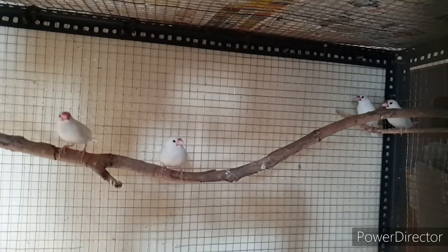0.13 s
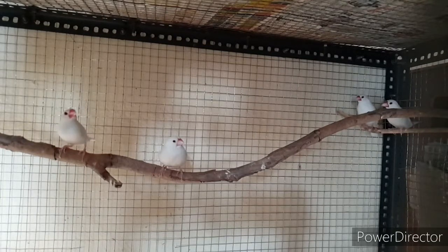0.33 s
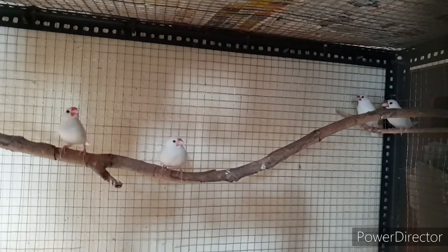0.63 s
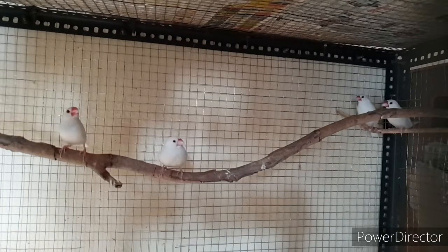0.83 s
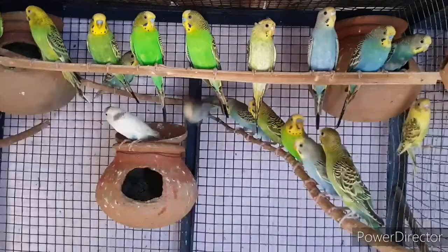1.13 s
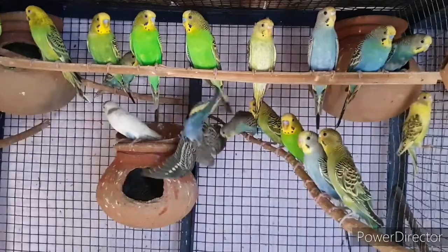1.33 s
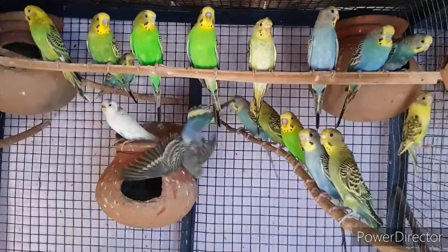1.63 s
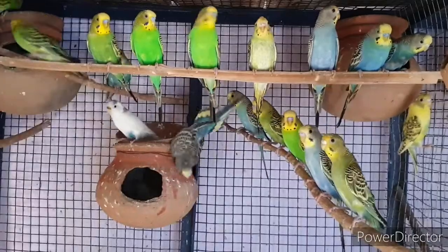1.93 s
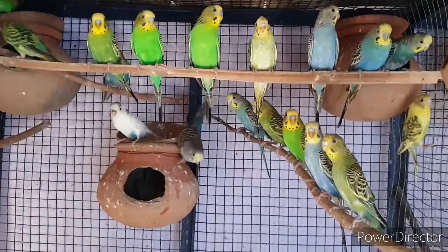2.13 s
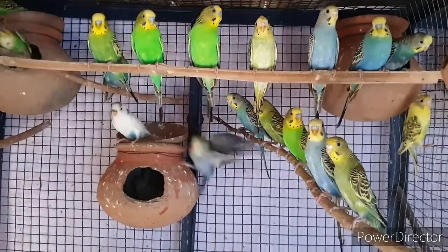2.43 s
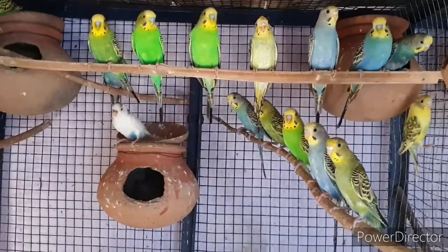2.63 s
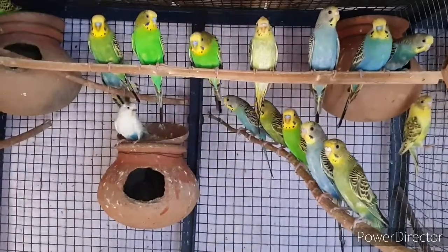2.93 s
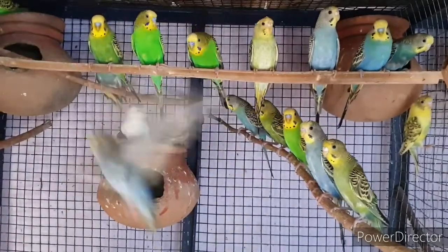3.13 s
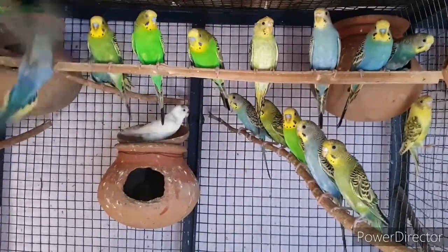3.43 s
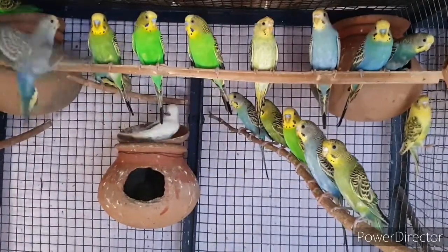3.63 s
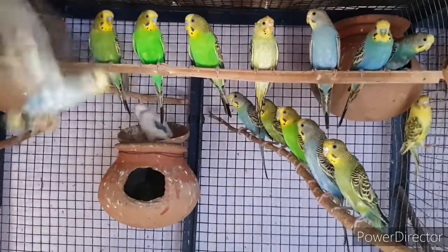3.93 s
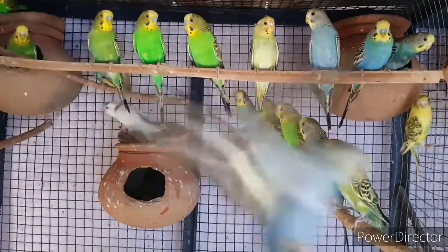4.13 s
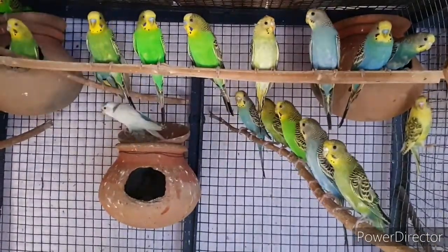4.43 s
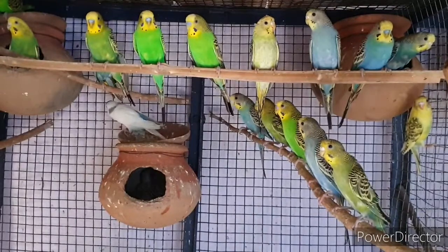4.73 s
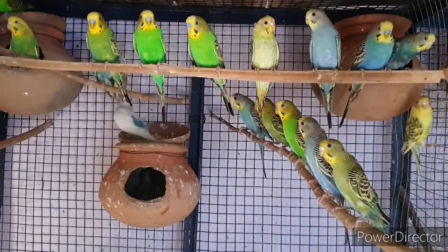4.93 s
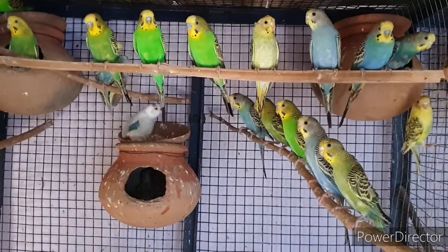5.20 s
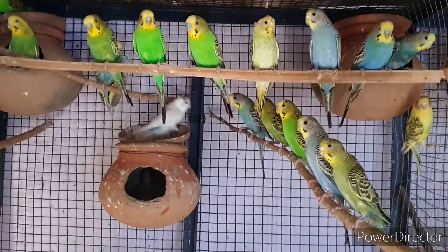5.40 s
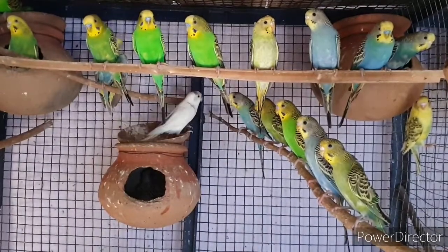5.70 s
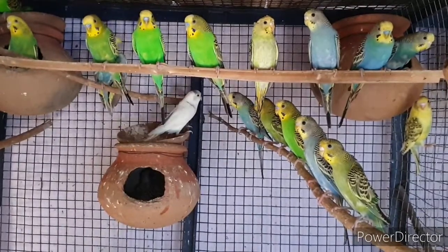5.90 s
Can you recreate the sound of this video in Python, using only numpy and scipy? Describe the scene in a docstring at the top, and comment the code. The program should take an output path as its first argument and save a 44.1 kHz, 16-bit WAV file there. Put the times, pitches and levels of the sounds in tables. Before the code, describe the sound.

Inside a wire aviary, faint soft hops in a muffled quiet give way without warning to loud, raspy scolding squawks from one small parrot near the centre. After the scolding stops, birds whirr past the microphone in short flights with thumping air, bright quill rustle and sharp wing flicks. Small woody or clay knocks and a few gentle, distant chirps dot the bustle, with a short room tail.

```python
"""In a wire aviary, budgerigars squabble. A muffled hush with a few soft hops breaks off abruptly into harsh squawks.
Birds flutter past the microphone, flick their wings, knock on perches and pots, and give a few soft chirps.
Calls are harmonic tones on moving pitches, the squawks roughened by a rattle and a ringing rasp.
Wings are coloured noise and pressure pulses; knocks are noise bursts with a short ring; hollow notes are
wavering sines. Calls pass through scattered echoes and a room tail."""
import sys
import numpy as np
from scipy import signal
from scipy.fft import rfft, irfft, next_fast_len
from scipy.io import wavfile
from scipy.ndimage import uniform_filter1d

SR = 44100
rng = np.random.default_rng(int(sys.argv[2]) if len(sys.argv) > 2 else 0)


def transcribe(signal):
    """Save signal, clipped to [-1, 1], as a 16-bit WAV file at the path in sys.argv[1]."""
    frames = np.atleast_2d(signal).T
    limited = np.clip(frames, -1, 1)
    pcm = np.round(limited * 32767).astype(np.int16)
    wavfile.write(sys.argv[1], SR, pcm)


N = 267201
TIME = np.arange(N) / SR

# wing noises, relative spectra: freq_hz, level_db
# broad whoosh of moved air
WHOOSH_SPECTRUM = [(70, -30.5), (130, -1), (250, 0), (370, -4), (540, -1.5), (800, -7.5), (1100, -14.5),
                   (2500, -27), (5000, -73)]
# bright rustle of quills
FEATHER_SPECTRUM = [(710, -31), (1200, -5), (2430, -5), (4960, -1.5), (6720, -8), (8720, -22), (10700, -9),
                    (12200, -11.5), (14800, -15), (16000, -32.5)]


def from_db(db):
    """Decibels to amplitude."""
    return 10 ** (np.asarray(db) / 20)


def rms_one(x):
    """Scale a sound to rms 1."""
    return x / np.sqrt(np.mean(x ** 2) + 1e-20)


def shaped(x, points, share=1):
    """Colour a sound by a curve of (Hz, dB), read along log frequency; share scales the dB."""
    hz, db = np.transpose(points)
    size = next_fast_len(x.shape[-1])
    log_hz = np.log(np.maximum(np.arange(size // 2 + 1) * SR / size, 1))
    gain = from_db(share * np.interp(log_hz, np.log(hz), db))
    return irfft(rfft(x, size) * gain, size)[..., :x.shape[-1]]


def noise(spectrum, alike, size=N):
    """Coloured stereo noise of rms 1; alike is the left-right likeness, 1 for mono."""
    mid, side = rng.standard_normal((2, size))
    alike = np.clip(alike, -1, 1)
    stereo = np.sqrt(1 + alike) * mid + np.sqrt(1 - alike) * side * [[1], [-1]]
    return rms_one(shaped(stereo, spectrum))


def wobble(rate_hz, size):
    """Random drift of rms 1 that heads for a new value rate_hz times a second."""
    knots = rng.standard_normal(int(size * rate_hz / SR) + 3)
    return rms_one(np.interp(np.arange(size) * rate_hz / SR, np.arange(len(knots)), knots))


def add(out, s, sound):
    """Mix a sound in at time s."""
    i = max(int(s * SR), 0)
    out[..., i:i + sound.shape[-1]] += sound[..., :N - i]


def burst(t, rise_s, t60):
    """An envelope that rises straight, then dies away by 60 dB in t60 seconds."""
    return np.minimum(t / rise_s, 1) * from_db(-60 * np.maximum(t - rise_s, 0) / t60)


def gate(t, attack_s, release_s):
    """An envelope over times t: attack, hold, release."""
    return np.minimum(t / attack_s, 1) * np.minimum((t[-1] - t) / release_s, 1)


def cycles(rate_hz, unsteady, change_hz, size):
    """Count of cycles gone by at an unsteady rate."""
    return np.cumsum(rate_hz * (1 + unsteady * wobble(change_hz, size))) / SR


def ticks(count):
    """A unit click at the start of each cycle."""
    return np.diff(np.floor(count), prepend=0)


def hush(hush_db=-58):
    """Dull stereo noise, with muffled hops as dying bursts of a duller knock colour."""
    # quiet background, relative spectrum: freq_hz, level_db
    hush_spectrum = [(12, -41.5), (20, 4.5), (42, -11.5), (76, -22.5), (144, -25), (571, -31.5), (772, -23),
                     (978, -47), (1350, -35), (1990, -33), (3400, -51.5), (4420, -99), (7480, -120)]
    # muffled hops: start_s, level_db, t60_s
    hop_events = [(0.117, -60, 0.45), (.39, -62, .3), (0.448, -56.5, 0.81)]
    # body of a hop, relative spectrum: freq_hz, level_db
    hop_spectrum = [(90, -17), (150, 8), (300, -7), (700, 2), (1000, -33), (1280, 8), (1680, 7), (1990, 3),
                    (2500, -34), (2800, -13), (3640, -65), (6160, -120)]
    envelope = np.zeros(N)
    for s, level_db, t60 in hop_events:
        add(envelope, s, from_db(level_db) * burst(TIME[:SR], 0.0021, t60))
    return from_db(hush_db) * noise(hush_spectrum, 0.11) + envelope * noise(hop_spectrum, 0.14)


def syrinx(pitch, partials):
    """Voice organ: harmonics in step on one moving pitch."""
    phase = 2 * np.pi * np.cumsum(pitch) / SR
    return sum(from_db(db) * np.sin(round(k) * phase) for k, db in partials)


def rasp(rattles, ring_t60=0.0069, hiss_db=-2):
    """Each rattle sets the throat ringing in the same way; some hiss rides along."""
    # rasp of the throat, relative spectrum: freq_hz, level_db
    rasp_spectrum = [(530, -62), (900, -28.5), (1120, -29.5), (1720, -22.5), (1970, -5.5), (2270, -16.5),
                     (2500, -8.5), (3230, -6), (4740, -5), (5890, 1.5), (7400, -22), (10200, -21),
                     (11800, -23), (13700, -19.5), (16000, -37.5)]
    t = TIME[:SR // 100]
    ring = rng.standard_normal(len(t)) * burst(t, 0.00048, ring_t60)
    buzz = rms_one(signal.fftconvolve(ticks(rattles), ring)[:len(rattles)])
    hiss = from_db(hiss_db) * rng.standard_normal(len(rattles))
    return rms_one(shaped(buzz + hiss, rasp_spectrum))


def squawks(rattle_hz=340, unsteady=.05, jitter=.06, jitter_hz=1300, quaver=.03, swing=0.13,
            rasp_share=0.87, shimmer_db=3.0, rattle_depth=0.45):
    """Calls glide in pitch and level; forced hard, the syrinx rattles and the tone breaks into a buzzing rasp."""
    # scolding squawks, before echoes: start_s, length_s, mid_call_pitch_hz, rise_octaves,
    # mid_call_level_db, swell_over_call_db, mid_call_roughness (0-1)
    squawk_calls = [(1.162, 0.047, 2156, .02, -35.5, -15, 0.66), (1.206, 0.052, 2390, .1, -23.5, 6, 0.9),
                    (1.254, 0.092, 2576, .16, -19.5, 0, 0.63), (1.389, .08, 2226, 0.0028, -15, 0.5, 0.3),
                    (1.515, 0.088, 2215, .04, -15, 7, 0.28), (1.647, 0.092, 2172, .28, -12.5, 1.5, 0.25),
                    (1.805, 0.13, 2480, .18, -19, -2.5, 0.77), (2.004, 0.1, 2486, .05, -17.5, 11.5, 0.52),
                    (2.319, .068, 2405, 0.0773, -30, 14, 0.35),
                    (2.447, 0.071, 2518, -0.013, -22, -1.5, 0.43), (2.616, 0.11, 2400, .1, -25, 5.5, 0.79)]
    # voice before the beak: harmonic_number, relative_level_db
    squawk_partials = [(1, -8), (2, 4), (3, -8), (4, -16.5), (5, -21), (6, -25.5)]
    # resonances of throat and beak: freq_hz, gain_db
    beak_curve = [(1200, -16.5), (2100, -6.5), (2700, 1), (3400, -17.5), (4200, 2.5), (5000, 0.5),
                  (6400, 4.5), (7800, -13.5), (9500, 0.5), (15000, -12.5)]
    arch_db = 5.5   # a call is this much weaker at its ends than in the middle, apart from its swell
    glide_bend = .7   # the glide steepens toward the end
    edge_roughness, settle_s = 0.6, .017   # a call starts and ends hoarser than it is in between
    attack_s, release_s = 0.014, .011
    out = np.zeros(N)
    for s, length_s, hz, rise, level_db, swell_db, roughness in squawk_calls:
        t = TIME[:int(length_s * SR)]
        size, along = len(t), t / length_s - .5
        pitch = hz * 2 ** (rise * (along + glide_bend * along ** 2))

        edge = np.exp(-np.minimum(t, length_s - t) / settle_s)
        rough = np.clip(roughness + (1 - roughness) * edge_roughness * edge, 0, 1)
        rattles = cycles(rattle_hz, unsteady, 200, size)
        rattle = np.sin(2 * np.pi * rattles)
        rough_scatter = rough * (jitter * wobble(jitter_hz, size) + swing * rattle)
        scatter = quaver * wobble(520, size) + rough_scatter
        tone = rms_one(shaped(syrinx(pitch * (1 + scatter), squawk_partials), beak_curve))

        # the rougher the call, the more rasp replaces tone, at constant power
        broken = np.clip(rasp_share * rough ** 2, 0, 1)
        voice = np.sqrt(1 - broken ** 2) * tone + broken * rasp(rattles)
        shimmer = from_db(shimmer_db * wobble(450, size))
        voice = rms_one(voice * (1 + rattle_depth * rough * rattle) * shimmer)
        level = from_db(level_db + swell_db * along - arch_db * (2 * along) ** 2)
        add(out, s, voice * level * gate(t, attack_s, release_s))
    return out


def nearness():
    """Gains of draught, whoosh and rustle: each flight swells as the bird nears and fades; flights add in power."""
    # short flights, levels before the trims in flight(): nearest_s, approach_s, departure_s,
    # draught_db, whoosh_db, rustle_db
    passes = [(1.3, 0.2, 0.43, -61, -49.5, -53.5), (1.8, 1, 0.95, -57.5, -57.5, -61),
              (2.719, 0.14, 0.34, -59, -40, -60), (3.02, 0.83, 0.53, -41, -43, -59.5),
              (3.29, 0.39, 0.26, -67, -48, -57.5), (3.44, 0.31, 0.11, -55, -66, -58),
              (3.6, 0.18, 0.34, -53, -51.5, -62.5), (3.999, 0.23, 0.32, -55, -48.5, -63.5),
              (4.13, 0.17, .2, -42.5, -51.5, -62), (4.318, 0.17, 0.23, -35.5, -43, -56.5),
              (4.44, 0.054, 0.4, -44, -55.5, -64.5), (4.66, .15, 0.21, -41, -50, -63.5),
              (4.85, 0.13, 0.37, -51, -45, -57.5), (5.07, 0.32, 0.22, -51, -46.5, -61),
              (5.159, 0.22, 0.25, -40.5, -47.5, -64), (5.531, 0.026, 0.16, -45.5, -62, -60.5),
              (5.898, 0.082, 0.088, -70.5, -53.5, -61)]
    # gain over the approach and loss over the departure: one entry each for draught, whoosh, rustle [dB]
    fade_db = [22, 21, 20.5]
    power = np.zeros((3, N))
    for s, approach_s, departure_s, *levels_db in passes:
        away = np.clip(np.maximum((s - TIME) / approach_s, (TIME - s) / departure_s), 0, 10)
        power += from_db(np.array(levels_db)[:, None] - np.outer(fade_db, away)) ** 2
    return np.sqrt(power)


def flight(beat_hz=28, beat_db=11, thump_hz=68, thump_db=-5, crackle_db=1.5, clump_db=2.0,
           draught_db=-1, whoosh_db=-0.54, feather_db=9.5):
    """Wingbeats throw pressure pulses, puffs of whoosh and feather rustle; the draught buffets the microphone."""
    # draught on the microphone, relative spectrum: freq_hz, level_db
    gust_spectrum = [(15, -34.5), (25, -23), (43, 2.5), (59, 4), (108, -0.5), (220, -15), (290, -35),
                     (480, -120)]
    draught, whoosh, feather = nearness()
    beats = cycles(beat_hz, .2, 12, N)
    # quick push, slower fade
    throb = rms_one(uniform_filter1d(from_db(-beat_db * (beats % 1)), SR // 200))
    pulse = np.gradient(signal.windows.gaussian(SR // 30, SR / (2 * np.pi * thump_hz)))
    thumps = rms_one(signal.fftconvolve(ticks(beats), pulse, "same"))
    grains = rms_one(from_db(crackle_db * wobble(550, N) + clump_db * wobble(83, N)))
    lows = draught * (from_db(draught_db) * noise(gust_spectrum, 0.57) + from_db(thump_db) * thumps)
    puffs = whoosh * from_db(whoosh_db) * noise(WHOOSH_SPECTRUM, 0.58)
    rustle = feather * from_db(feather_db) * grains * noise(FEATHER_SPECTRUM, .1)
    # the root keeps quills rubbing between beats
    return lows + throb * puffs + np.sqrt(throb) * rustle


def hollows(waver=0.055):
    """Short low notes, as of air stirred in a nest pot: wavering sines that swell and fade."""
    # hollow notes: centre_s, pitch_hz, peak_rms_level_db, half_length_s (spread of the bell-shaped envelope)
    hollow_notes = [(1.333, 377, -52.5, 0.02), (2.004, 102.8, -55.5, 0.16), (2.094, 378, -42, 0.013),
                    (2.184, 385, -50, 0.019), (4.036, 550, -43.5, 0.0032), (4.814, 375, -37.5, 0.0046),
                    (4.856, 362.7, -41.5, 0.019), (5.262, 413, -47.5, 0.032)]
    out = np.zeros(N)
    for s, hz, level_db, half_s in hollow_notes:
        t = np.arange(-SR // 10, SR // 10) / SR
        pitch = hz * (1 + waver * wobble(136, len(t)))
        tone = np.sqrt(2) * np.sin(2 * np.pi * np.cumsum(pitch) / SR)
        add(out, s + t[0], from_db(level_db) * tone * np.exp(-.5 * (t / half_s) ** 2))
    return out


def chirps(jitter=0.02):
    """Gentle calls dip, glide upward and ease back, with a slight tremble, through a nearly closed beak."""
    # soft chirps: start_s, length_s, mid_call_pitch_hz, rise_octaves (lowest to highest),
    # level_db (before partials, beak and echoes)
    chirp_calls = [(2.415, .031, 1852, .16, -40), (3.856, 0.1, 2002, 0.25, -53),
                   (4.068, .145, 1407, 0.155, -55.5), (4.541, 0.014, 1310, .04, -50),
                   (4.574, 0.021, 1300, 0.043, -45.5)]
    # voice before the beak: harmonic_number, level_db
    chirp_partials = [(1, 2), (2, -4.5)]
    # a nearly closed beak: freq_hz, gain_db
    closed_beak = [(1900, -2.5), (2700, 0.5), (3600, 10.5), (4300, -23.5)]
    edge_s = 0.0086   # fade at both ends
    bend_cycles = .8   # share of a sine that the glide follows
    out = np.zeros(N)
    for s, length_s, hz, rise, level_db in chirp_calls:
        t = TIME[:int(length_s * SR)]
        glide = np.sin(2 * np.pi * bend_cycles * (t / length_s - .5))
        pitch = hz * 2 ** (rise / 2 * glide)
        tone = syrinx(pitch * (1 + jitter * wobble(615, len(t))), chirp_partials)
        add(out, s, tone * from_db(level_db) * gate(t, edge_s, edge_s))
    return shaped(out, closed_beak)


def strokes(swish_db=-12, push_db=-5.5, swish_t60=0.078, push_t60=0.17, crackle_db=2.0):
    """A hard wing stroke is a crackling swish of quills with a soft push of air; runs build up and ease off."""
    # runs of hard wingbeats, levels before the swish and push trims: hardest_s, beats_before, beats_after
    # (both rounded to whole beats), interval_s, feather_db, air_push_db, loss_per_beat_db
    wing_runs = [(2.9203, 2, 4, .035, -33, -37.5, 1.4), (4.6494, -0.5, 2, .032, -22.5, -56, 7.5),
                 (4.9334, 8.5, 2, .0435, -23.5, -51, 3)]
    # lone flicks of a wing, levels before the same trims: time_s, feather_db, air_push_db
    wing_flicks = [(3.285, -27, -44), (3.4558, -29.5, -43.5), (3.506, -35, -58), (3.551, -31, -45),
                   (3.776, -38.5, -62), (3.907, -30.5, -66), (3.9568, -26, -60), (4.315, -25.5, -39),
                   (4.598, -34, -65), (5.496, -31.5, -53), (5.559, -38.5, -59), (5.593, -35.5, -59)]
    beats = []
    for s, before, after, interval_s, feather_db, air_db, loss_db in wing_runs:
        for k in range(-round(before), round(after) + 1):
            loss = loss_db * abs(k)
            beats.append((s + k * interval_s, feather_db - loss, air_db - loss))

    swish, push, t = np.zeros(N), np.zeros(N), TIME[:SR // 5]
    for s, feather_db, air_db in beats + list(wing_flicks):
        add(swish, s - .001, from_db(feather_db + swish_db) * burst(t, 0.00098, swish_t60))
        add(push, s - .001, from_db(air_db + push_db) * burst(t, 0.00045, push_t60))
    crackle = rms_one(from_db(crackle_db * wobble(1200, N)))
    quills = swish * crackle * noise(FEATHER_SPECTRUM, 0.03)
    return quills + push * noise(WHOOSH_SPECTRUM, 0.85)


def knocks(crack_db=-3, crack_t60=0.017, shiver_db=-19, shiver_t60=0.13, ring_db=-8, ring_t60=0.02):
    """A dry crack and a short ring from the struck spot, then the perch and mesh shiver briefly."""
    # feet and beaks on perches and pots: time_s, level_db (before crack, shiver and ring trims),
    # ring_hz, left_minus_right_db
    blows = [(3.46, -34.5, 810, 3), (3.522, -24.5, 876, 1), (3.574, -20, 845, -1.5),
             (3.906, -41.5, 1040, 2), (4.578, -39, 1260, -1), (4.651, -30, 1410, -2),
             (5.518, -24.5, 1446, -9.5)]
    # crack and shiver, relative spectrum: freq_hz, level_db
    knock_spectrum = [(47, -35), (80, 14.5), (422, -6), (650, 1), (1050, -3.5), (1490, -6.5), (2900, -14.5),
                      (4830, -6.5), (6450, -7.5), (8790, -30), (10700, -14), (12800, -11), (14600, -21),
                      (16000, -38)]
    out, t = np.zeros((2, N)), TIME[:SR // 3]
    for s, level_db, hz, pan_db in blows:
        crack = from_db(crack_db) * burst(t, 0.00066, crack_t60)
        shiver = from_db(shiver_db) * burst(t, 0.0066, shiver_t60)
        ring = from_db(ring_db) * burst(t, 0.0007, ring_t60) * np.sin(2 * np.pi * hz * t)
        gains = from_db(level_db + pan_db * np.array([[.5], [-.5]]))
        add(out, s, gains * ((crack + shiver) * noise(knock_spectrum, 0.31, len(t)) + ring))
    return out


def aviary(x, port_lag_s=.00007, direct_db=-3, early_db=-2, early_t60=0.063, tail_db=-14, tail_t60=0.38):
    """Sound reaches the left port first; close walls scatter it and the room adds a tail."""
    t = TIME[:SR * 3 // 4]
    shape = (2, len(t))
    # sparse early reflections, then a dense tail
    early = rng.standard_normal(shape) * (rng.random(shape) < .06) * burst(t, 0.003, early_t60)
    tail = rng.standard_normal(shape) * burst(t, 0.028, tail_t60)
    echoes = sum(from_db(db) * h / np.linalg.norm(h, axis=1, keepdims=True)
                 for db, h in [(early_db, early), (tail_db, tail)])
    direct = np.array([x, np.interp(TIME - port_lag_s, TIME, x)])
    return from_db(direct_db) * direct + signal.fftconvolve(x[None], echoes, axes=1)[:, :N]


def moving(x, turn_hz=2.7, count=3):
    """The callers dart about, so their echoes pass through several patterns in turn."""
    turns = [np.cos(2 * np.pi * (turn_hz * TIME - k / count)) for k in range(count)]
    shares = np.maximum(turns, 0)
    return sum(aviary(x * share) for share in shares / np.linalg.norm(shares, axis=0))


def scene(outbreak_s=1.167, air_db=-64):
    """The hush gives way abruptly to squabbling and flight over a faint air noise."""
    # where the scolding bird is: time_s, left_minus_right_db
    place = [(1.3, -1), (1.45, 1), (1.58, -1), (1.69, -4), (1.85, -0.5), (2.08, -1), (2.33, -2),
             (2.67, -1.5)]
    # background air, relative spectrum: freq_hz, level_db
    air_spectrum = [(18, -42.5), (30, -23), (66, -4), (199, -20), (374, -14), (750, -18.5), (1050, -23),
                    (1320, -24.5), (1670, -18), (2010, -33.5), (6000, -25.5), (8500, -47), (12000, -39),
                    (16000, -45)]
    place_s, place_db = np.transpose(place)
    pan_db = np.interp(TIME, place_s, place_db)
    scolding = moving(squawks()) * from_db(pan_db * [[.5], [-.5]])
    birds = scolding + aviary(chirps())
    air = from_db(air_db) * noise(air_spectrum, 0.076)
    bustle = flight() + strokes() + knocks() + hollows() + air
    awake = np.clip((TIME - outbreak_s) / 0.00062, 0, 1)   # crossfade in under a millisecond
    return (1 - awake) * hush() + awake * (birds + bustle)


def record(dry, cutoff_hz=15900, ceiling=.85):
    """The left port is brighter; peaks are rounded and the top is cut."""
    # the microphone's lean to the left: freq_hz, left_minus_right_db
    port_lean = [(60, 0), (700, 3.5), (4400, 1.3), (8200, 10), (15000, 7.5)]
    # each port takes half the difference
    ports = np.array([shaped(dry[0], port_lean, share=.5), shaped(dry[1], port_lean, share=-.5)])
    rounded = ceiling * np.tanh(ports / ceiling)
    return signal.sosfilt(signal.ellip(10, .1, 90, cutoff_hz, fs=SR, output="sos"), rounded)


dry = scene()
out = record(dry)
transcribe(out)
```